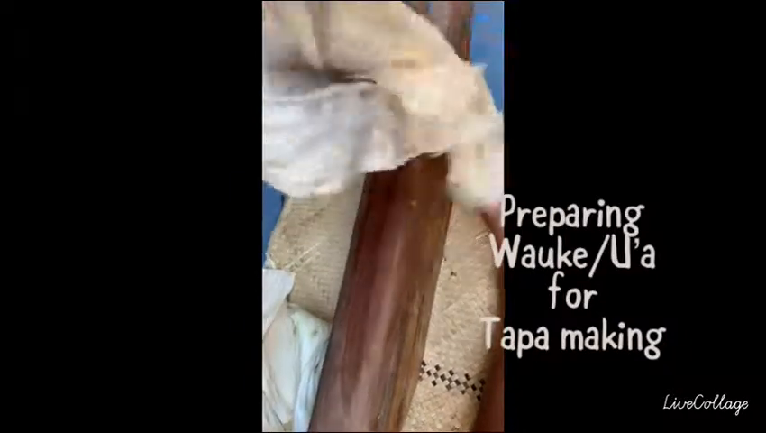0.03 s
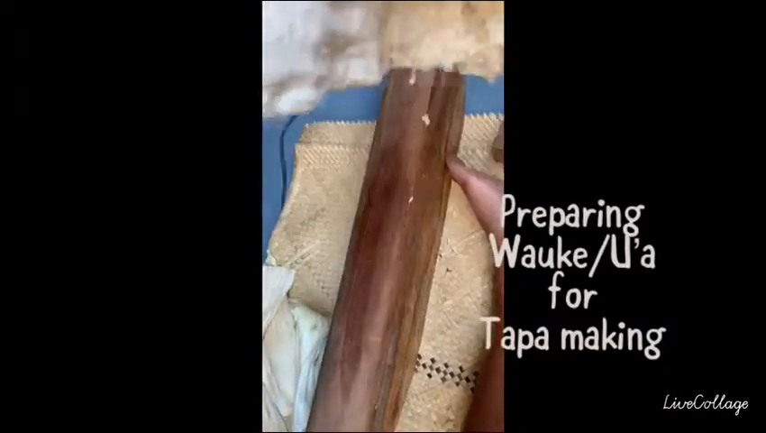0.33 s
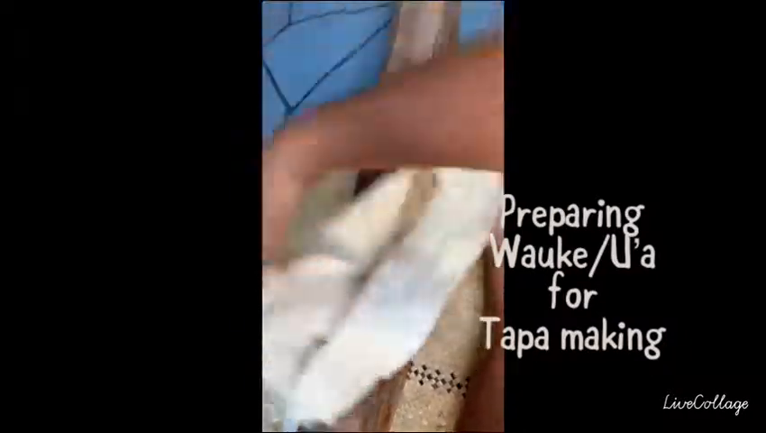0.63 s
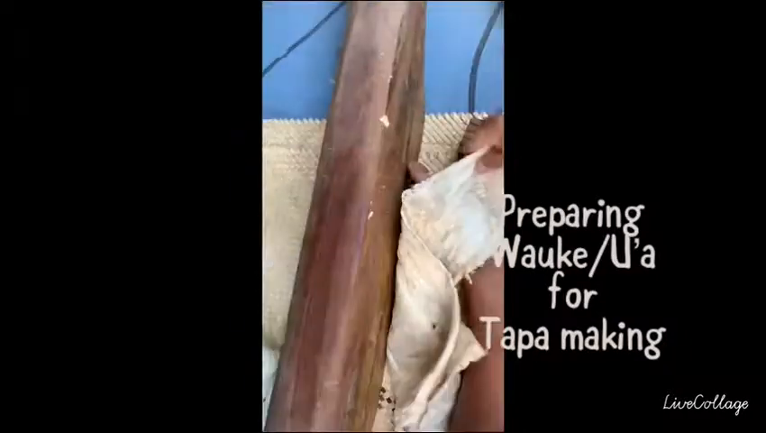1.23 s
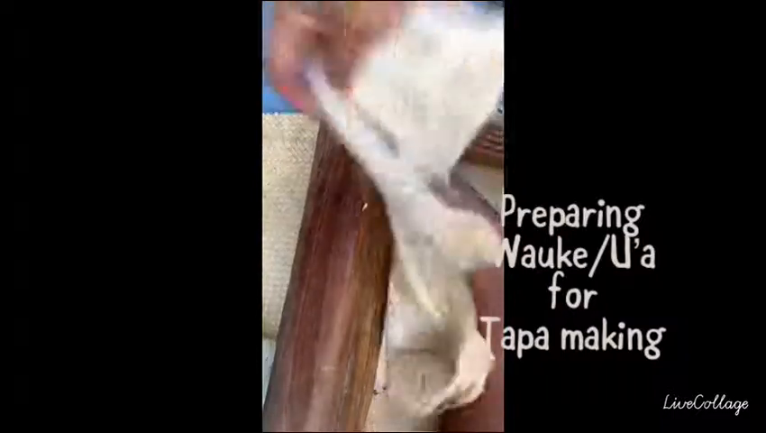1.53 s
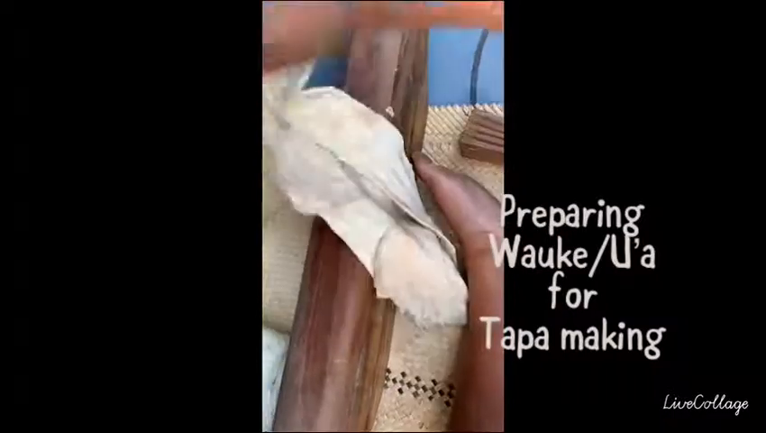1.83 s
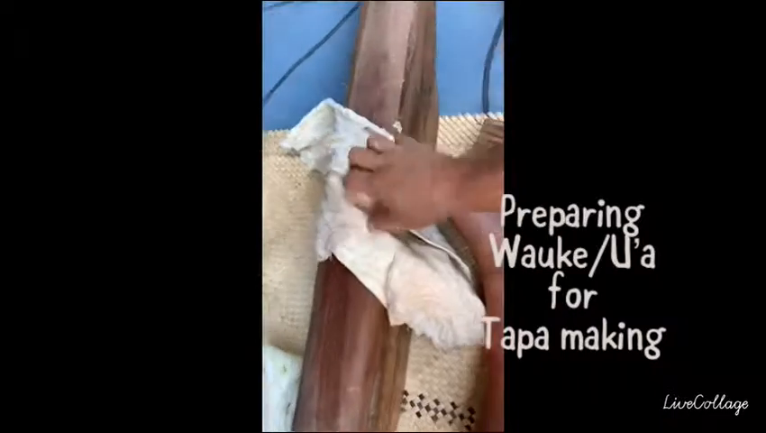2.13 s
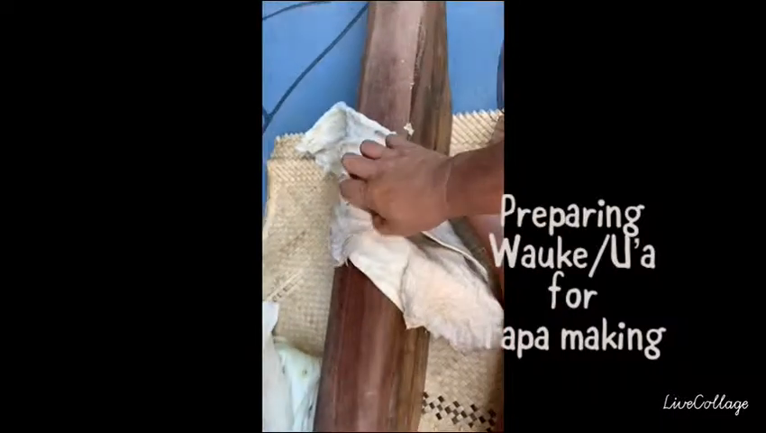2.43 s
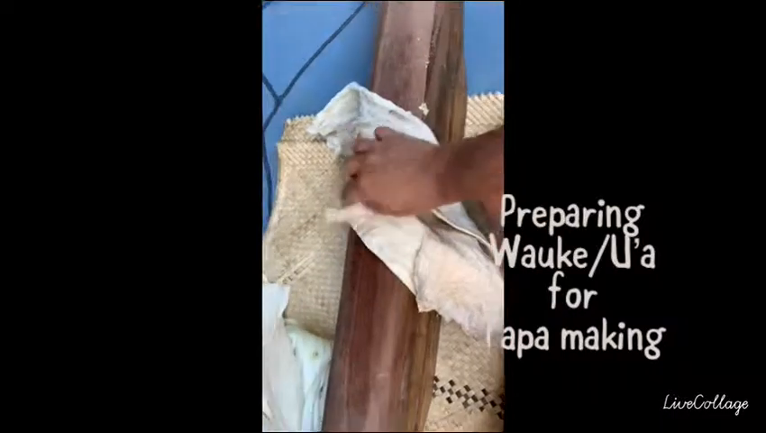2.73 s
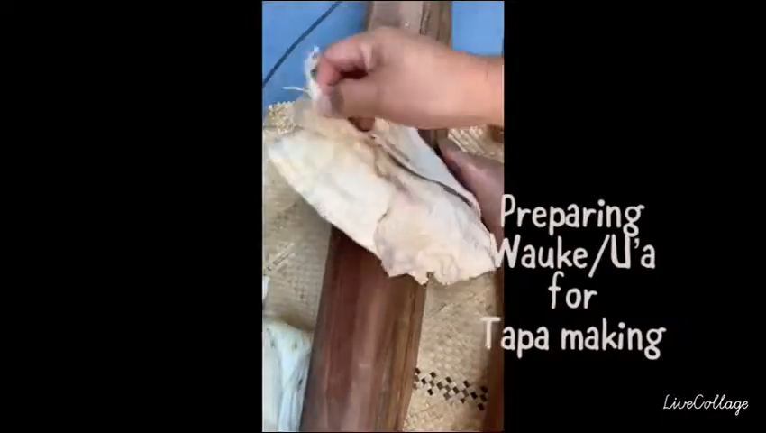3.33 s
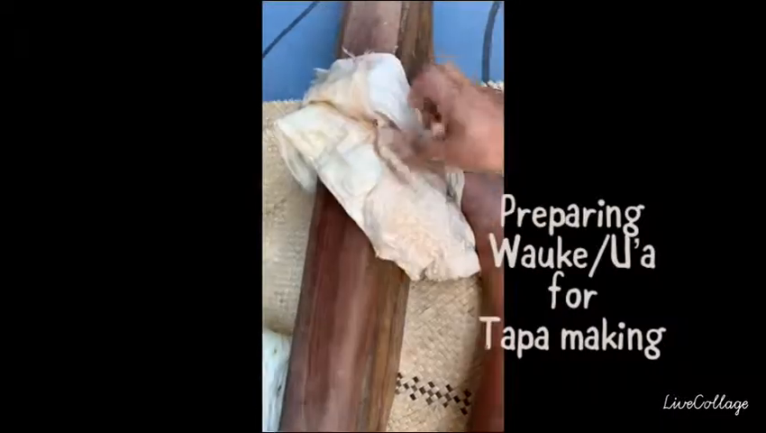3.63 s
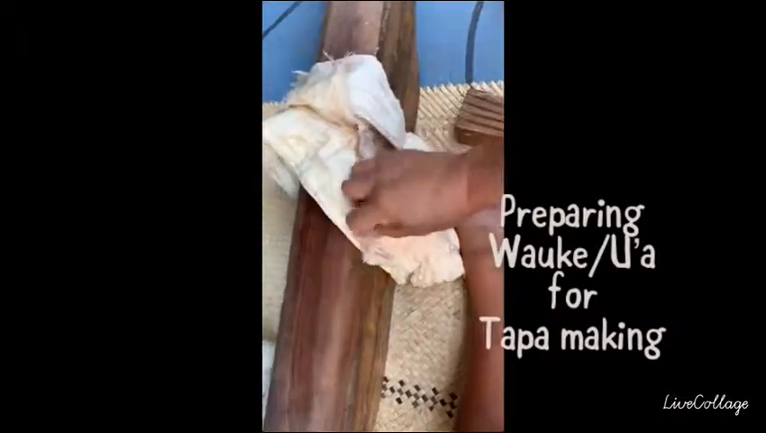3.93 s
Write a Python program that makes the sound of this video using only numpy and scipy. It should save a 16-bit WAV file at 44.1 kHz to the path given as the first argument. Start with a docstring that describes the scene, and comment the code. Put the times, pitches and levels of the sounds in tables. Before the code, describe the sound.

Damp cloth slaps a wooden beam lightly right at the start, then harder with a dull knock at 0.7 seconds. Low air puffs bump the close microphone, most around 0.9 to 1.2 and 2.7 seconds. The cloth rustles on and off, its folds snapping at 1.6, with a small pat near 1.9. Outdoors, distant traffic rumbles throughout under a faint hiss, its tyre swish sinking and fading after 3 seconds.

```python
"""Outdoors, distant traffic rumbles and hums from the start, under a faint high hiss.
Damp bark cloth is swung onto a wooden beam: a light slap, then a heavier one, with the swings
pushing puffs of air at the microphone. The traffic swells, with a faint tyre whine, while the cloth
is dragged, patted and plucked by hand, its fibres rustling and its folds snapping loose.
Near the end a swish sinks in pitch and the tyre noise fades, leaving the rumble."""
import sys
import numpy as np
from scipy import signal
from scipy.fft import rfft, irfft
from scipy.io import wavfile

SR = 44100
rng = np.random.default_rng(int(sys.argv[2]) if len(sys.argv) > 2 else 0)


def dump_mix(stems):
    """Bounce the given channels to the path in sys.argv[1] as a 16-bit WAV at rate SR."""
    frames = np.atleast_2d(stems).T  # one column per channel
    limited = np.clip(frames, -1, 1)  # hard clip at full scale
    pcm = np.round(limited * 32767).astype(np.int16)
    wavfile.write(sys.argv[1], SR, pcm)


N = 176400
T = np.arange(N) / SR
HZ = np.maximum(np.arange(N // 2 + 1) * SR / N, 1)


def from_db(db):
    """Decibels to gain."""
    return 10 ** (np.asarray(db) / 20)


def rms_one(x):
    """Scale to an rms of one."""
    return x / np.sqrt(np.mean(x ** 2) + 1e-20)


def automation(rows):
    """Join timed breakpoints into one curve per column."""
    times, *columns = np.transpose(rows)
    return [np.interp(T, times, column) for column in columns]


def fader(rows):
    """A gain curve from breakpoints in seconds and dB."""
    return from_db(automation(rows)[0])


def envelope(start, attack, hold, release):
    """Straight rise, hold, exponential fall; times in seconds."""
    rise = np.clip((T - start) / attack, 0, 1)
    return rise * np.exp(-np.clip((T - start - hold) / release, 0, 20))


def over_hz(points):
    """Join breakpoints along a log frequency axis."""
    hz, value = np.transpose(points)
    return np.interp(np.log(HZ), np.log(hz), value)


def brightened(colour, tilt_db):
    """Tilt an EQ curve about 1 kHz, by tilt_db for each factor of e in frequency."""
    return [(hz, db + tilt_db * np.log(hz / 1000)) for hz, db in colour]


def slow_noise(shape, width_hz):
    """Random drift, rolled off above width_hz."""
    return irfft(rfft(rng.standard_normal(shape)) / (1 + (HZ / width_hz) ** 2), N)


def wavering(hz, width_hz):
    """A band of stereo noise round a steady or moving pitch; rms 1."""
    a, b = slow_noise((2, 2, N), width_hz)
    phase = 2 * np.pi * np.cumsum(hz * np.ones(N)) / SR
    mid, side = a * np.cos(phase) + b * np.sin(phase)
    return rms_one(mid + from_db(-13) * side * [[1], [-1]])


# Stereo image. Each row: frequency in Hz, likeness of left and right from 0 to 1.
STEREO_LIKENESS = [(60, 1), (100, 1), (160, 1), (250, 0.96), (600, 0.67), (1600, 0.72), (3000, 0.53),
                   (4500, 1), (8000, 1), (16000, 1)]

def coloured(pair, colour):
    """EQ two unrelated signals and blend them as mid and side; rms 1."""
    mid, side = rfft(pair) * from_db(over_hz(colour))
    alike = np.clip(over_hz(STEREO_LIKENESS), 0, .995)
    return rms_one(irfft(np.sqrt(1 + alike) * mid + np.sqrt(1 - alike) * side * [[1], [-1]], N))


def noise(colour):
    """Stereo noise through an EQ curve; rms 1."""
    return coloured(rng.standard_normal((2, N)), colour)


def swirled(x, depth_db=2.5, width_hz=53, duration_s=0.13):
    """Moving air lets narrow parts of a far sound swell and fade on their own; rms 1."""
    hz, times, spectra = signal.stft(x, SR, nperseg=2048)
    swirl = rng.standard_normal(spectra.shape[1:])
    for axis, step in enumerate([hz[1] / width_hz, times[1] / duration_s]):
        swirl = signal.lfilter([1], [1, -np.exp(-step)], swirl, axis=axis)
    _, out = signal.istft(spectra * from_db(depth_db * rms_one(swirl)), SR, nperseg=2048)
    return rms_one(out[:, :N])


# Rumble EQ. Each row: frequency in Hz, relative level in dB.
RUMBLE_EQ = [(5, -35), (20, -7.5), (46, 4.5), (65, -1.5), (105, -2.5), (150, -8.5), (200, -11.5),
             (270, -18), (400, -26.5), (800, -40.5), (4000, -86)]
# Rumble fader. Each row: time in seconds, level in dB.
RUMBLE_FADER = [(0, -37), (.6, -38.5), (1.4, -37.5), (2.2, -38.5), (2.5, -38.5), (2.8, -34), (3.2, -36),
                (4, -35)]

def traffic_rumble():
    """Far traffic lays down a nearly steady bed of bass."""
    return fader(RUMBLE_FADER) * noise(RUMBLE_EQ)


# Roar EQ. Each row: frequency in Hz, relative level in dB.
ROAR_EQ = [(80, -30), (180, 4.5), (280, 3), (340, -1.5), (415, -1.5), (480, -17.5), (640, -9), (920, -4),
           (1100, -37.5), (3000, -50.5)]
# Roar fader. Each row: time in seconds, level in dB.
ROAR_FADER = [(0, -50.5), (.6, -48), (1.1, -47.5), (1.5, -48.5), (2.1, -44), (2.5, -50), (2.85, -42.5),
              (3.15, -51.5), (4, -51.5)]
# Hum fader. Each row: time in seconds, level in dB.
HUM_FADER = [(0, -41), (1.4, -46.5), (1.65, -37), (2.3, -40.5), (2.6, -44.5), (4, -58.5)]

def engines():
    """Distant engines give a surging low roar and a wavering hum."""
    roar = fader(ROAR_FADER) * noise(ROAR_EQ)
    hum = fader(HUM_FADER) * wavering(98.5, width_hz=6)
    return roar + hum


# Tyre EQ. Each row: frequency in Hz, relative level in dB.
TYRE_EQ = [(200, -0.5), (400, 0), (560, -0.5), (850, 1.5), (1100, -3), (1800, -5), (2600, -9.5),
           (3300, -14.5), (4500, -15), (6000, -18.5), (7500, -32.5), (10000, -34), (13000, -41),
           (16000, -45)]
# Tyre fader. Each row: time in seconds, level in dB.
TYRE_FADER = [(0, -47), (.5, -47.5), (.9, -45), (1.3, -43.5), (1.7, -44.5), (2.2, -43.5), (2.6, -44),
              (2.9, -45), (3.2, -46), (3.6, -48), (4, -50.5)]

def tyre_noise():
    """A wash of far tyres swells and fades through moving air."""
    return fader(TYRE_FADER) * swirled(noise(TYRE_EQ))


# Hiss fader. Each row: time in seconds, level in dB.
HISS_FADER = [(0, -58.5), (.6, -80), (1.2, -70), (1.7, -76), (1.9, -61), (2.4, -68), (2.8, -67), (4, -100)]

def high_hiss():
    """A thin hiss, perhaps insects, comes and goes in the distance."""
    return fader(HISS_FADER) * wavering(5340, width_hz=150)


def crackle(per_second=5000, spread_db=3.5):
    """Two dense streams of clicks of uneven size."""
    sizes = from_db(spread_db * np.minimum(rng.exponential(1, (2, N)), 5))
    signs = rng.choice([-1, 1], (2, N))
    return sizes * signs * (rng.random((2, N)) < per_second / SR)


# Crackle EQ. Each row: frequency in Hz, relative level in dB.
CRACKLE_EQ = [(1000, -14), (3000, -4), (5800, 9.5), (7000, 8.5), (8700, 8.5), (10500, 8), (13000, 2.5),
              (14500, 4), (16000, 11.5)]
# Cloth strokes. Each row: start in seconds, hold in seconds, level in dB, treble tilt in dB.
STROKES = [(-0.007, 0.077, -61, -8), (0.664, 0.16, -63, -18.5), (0.696, 0.03, -51.5, -7),
           (0.794, 0.04, -67, -17), (1.353, 0.08, -68, -3), (1.425, 0.11, -56.5, -1),
           (1.559, 0.093, -54, 7), (1.65, .045, -66, 2), (1.758, 0.06, -61, -10), (1.935, 0.096, -58.5, -1),
           (2.06, 0.46, -56, -20), (2.634, .045, -59, -11), (2.7, 0.13, -60, -17),
           (3.082, 0.088, -63.5, -10), (3.186, 0.14, -65, 1)]

def rustle(catch_db=2.6, catch_hz=55):
    """Fibres slip in dense clicks, which clump as the sliding cloth catches and lets go."""
    clumps = crackle() * from_db(catch_db * rms_one(slow_noise(N, catch_hz)))
    out = np.zeros((2, N))
    for start, hold, db, tilt_db in STROKES:
        fibres = coloured(clumps, brightened(CRACKLE_EQ, tilt_db))
        out += from_db(db) * envelope(start, attack=.03, hold=hold, release=.03) * fibres
    return out


# Slap EQ. Each row: frequency in Hz, relative level in dB.
SLAP_EQ = [(150, -0.5), (420, 7), (750, -12), (1150, 1.5), (1500, -1.5), (2100, -14), (2700, -10.5),
           (4500, -15.5), (7000, -25), (11000, -31.5), (16000, -33)]
# Cloth landings. Each row: start in seconds, hold in seconds, slap level in dB,
# knock level in dB, treble tilt in dB.
LANDINGS = [(0.0645, 0.001, -33.5, -33, 1), (0.069, 0.006, -42, -50, -4), (0.7142, 0.003, -29, -27, 0),
            (0.7172, 0.0055, -26, -18.5, -1.8), (0.738, 0.004, -42, -33, -3), (1.946, 0.008, -43, -55, 6)]

def slaps():
    """Damp cloth lands with a short splat, then its folds settle more softly."""
    out = np.zeros((2, N))
    for start, hold, db, _, tilt_db in LANDINGS:
        splat = envelope(start, attack=.001, hold=hold, release=.003)
        settle = from_db(-16) * envelope(start, attack=.02, hold=.02, release=.02)
        out += from_db(db) * (splat + settle) * noise(brightened(SLAP_EQ, tilt_db))
    return out


# Beam modes. Each row: frequency in Hz, relative level in dB, seconds to fall by 60 dB.
BEAM_MODES = [(238, -8.5, 0.089), (371, -12.5, 0.16), (426, -3, 0.033), (880, -19, 0.064),
              (1085, -16.5, 0.049), (1515, -12.5, 0.036), (2100, -16, 0.045), (2840, -31, 0.04)]

def beam_knocks():
    """Each landing rings the wooden beam briefly, damped under the cloth."""
    blows, out = np.zeros(N), np.zeros(N)
    for start, _, _, knock_db, _ in LANDINGS:
        blows[int(start * SR)] += from_db(knock_db)
    for k, (hz, db, t60) in enumerate(BEAM_MODES):
        decay, step = np.exp(-np.log(1000) / (t60 * SR)), 2 * np.pi * hz / SR
        ring = signal.lfilter([0, np.sin(step)], [1, -2 * decay * np.cos(step), decay ** 2], blows + 1e-18)
        out += (-1) ** k * from_db(db) * ring
    return out


# Short bright ticks. Each row: start in seconds, hold in seconds, level in dB.
TICKS = [(0.0649, 0.0012, -47.5), (.847, 0.004, -62), (1.5835, 0.005, -44), (1.602, 0.003, -54),
         (1.615, 0.006, -53), (1.637, 0.005, -53), (1.658, 0.004, -55), (1.9455, 0.004, -49),
         (2.02, 0.003, -60), (3.01, 0.002, -64)]

def bright_ticks():
    """Tight bursts of crackle: one faint lone treble tick at 0.85 s, the others cloth folds snapping."""
    bursts = sum(from_db(db) * envelope(start, attack=.0007, hold=hold, release=.002)
                 for start, hold, db in TICKS)
    return bursts * coloured(crackle(), CRACKLE_EQ)


# Puffs and soft bumps at the microphone. Each row: centre in seconds, peak in dB, pitch in Hz.
AIR_PUFFS = [(0.137, -23.5, 59.6), (.287, -32, 210), (0.394, -25.5, 111), (0.445, -24, 70),
             (0.691, -22.5, 62), (.726, -30, 225), (.739, -29.5, 99), (0.875, -17, 57), (.955, -23.5, 72.5),
             (1.012, -33, 95), (1.04, -24, 77), (1.172, -25.5, 104), (1.195, -22.5, 219),
             (1.203, -15.5, 123), (1.231, -28, 300), (1.236, -19.5, 129), (1.246, -19.5, 56.7),
             (1.5, -31, 198), (1.585, -22, 59), (2.33, -22.5, 86), (2.641, -23, 143), (2.651, -17, 74),
             (2.732, -23.5, 95), (2.807, -31, 200), (2.817, -20.5, 81), (2.835, -30.5, 255),
             (3.016, -28.5, 85), (3.046, -27, 79), (3.901, -28.5, 98)]

def air_puffs(half_width_cycles=0.76):
    """Each puff is one or two slow swings of pressure, with turbulence that differs between the ports."""
    eddies = from_db(-19.5) * noise(RUMBLE_EQ)[0] * [[1], [-1]]
    out = np.zeros((2, N))
    for centre, db, hz in AIR_PUFFS:
        cycles = (T - centre) * hz
        swell = np.exp(-np.minimum((cycles / half_width_cycles) ** 2, 20))
        out += from_db(db) * swell * (np.cos(2 * np.pi * cycles) + eddies)
    return out


# Whine automation. Each row: time in seconds, pitch in Hz, level in dB.
WHINE_PATH = [(0, 738, -74), (.45, 738, -53.5), (.68, 730, -49.5), (.85, 790, -56), (1.25, 780, -53.5),
              (1.62, 748, -51), (1.8, 800, -57), (2.1, 828, -57), (2.8, 783, -68), (4, 767, -60)]

def tyre_whine():
    """Far tyres sing a faint wandering note with a weaker one above it."""
    hz, db = automation(WHINE_PATH)
    lower = wavering(hz, width_hz=11)
    upper = from_db(-3) * wavering(1.7 * hz, width_hz=11)
    return from_db(db) * (lower + upper)


# Swish automation. Each row: time in seconds, band centre in Hz, level in dB.
SWISH_PATH = [(0, 2700, -82), (1.9, 2620, -72), (2.5, 2295, -58), (2.85, 1625, -50), (3.3, 1409, -64.5),
              (4, 1316, -57.5)]

def tyre_swish():
    """A broad swish rises out of the tyre noise and sinks in pitch."""
    hz, db = automation(SWISH_PATH)
    return from_db(db) * swirled(wavering(hz, width_hz=660))


def scene():
    """The cloth close by, the traffic and the hiss far away."""
    close = slaps() + beam_knocks() + rustle() + bright_ticks() + air_puffs()
    traffic = traffic_rumble() + engines() + tyre_noise() + tyre_whine() + tyre_swish()
    return close + traffic + high_hiss()


# Phase between the microphone's ports. Each row: frequency in Hz, lead of the left in radians.
PORT_LEAD = [(0, 0), (1120, -.3), (2000, .4), (3900, 1.9), (4900, 3.2), (7000, 6.3), (9100, 9.4),
             (11200, 12.6), (13300, 15.7), (16000, 19.6)]

def record(dry, cutoff_hz=15700):
    """The two ports hear the treble out of step; the top is cut steeply."""
    hz = np.arange(N + 1) * SR / (2 * N)
    lead = np.interp(hz, *np.transpose(PORT_LEAD))
    ports = np.exp(.5j * lead * [[1], [-1]])
    low_pass = 1 / np.sqrt(1 + (hz / cutoff_hz) ** 200)
    edge_fade = np.clip(np.minimum(T, T[::-1]) / .003, 0, 1)
    return irfft(rfft(dry * edge_fade, 2 * N) * ports * low_pass)[:, :N]


dry = scene()
out = record(dry)
dump_mix(out)
```